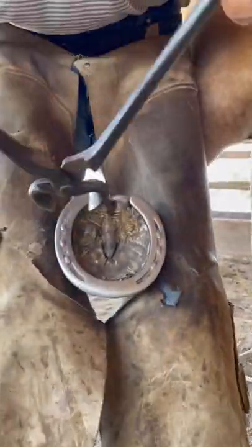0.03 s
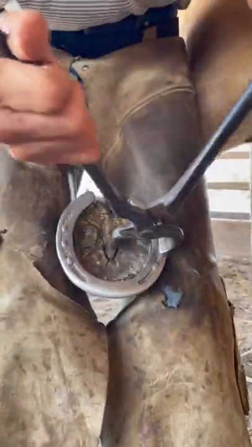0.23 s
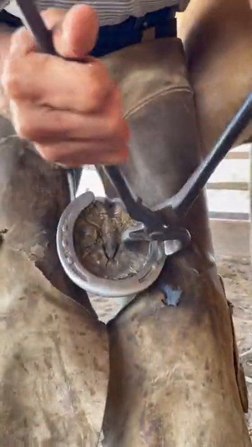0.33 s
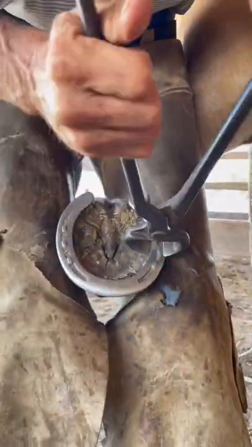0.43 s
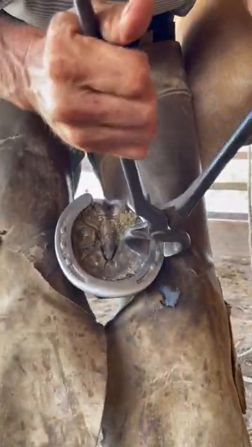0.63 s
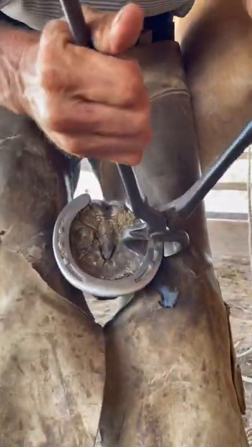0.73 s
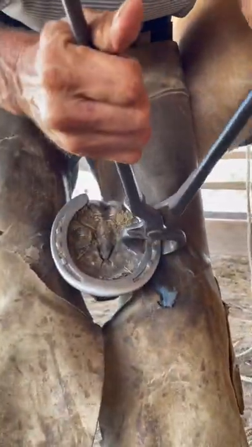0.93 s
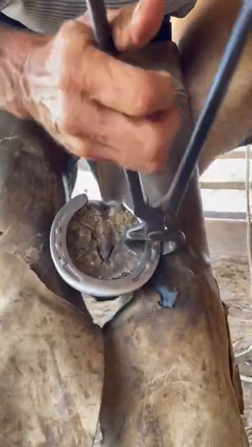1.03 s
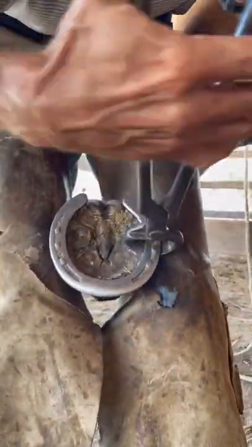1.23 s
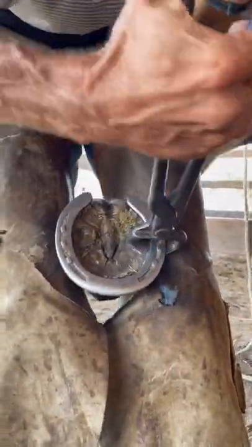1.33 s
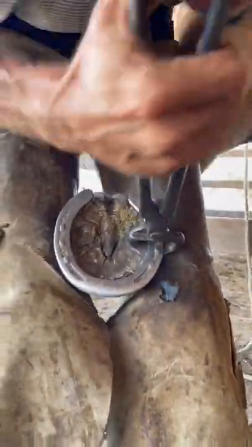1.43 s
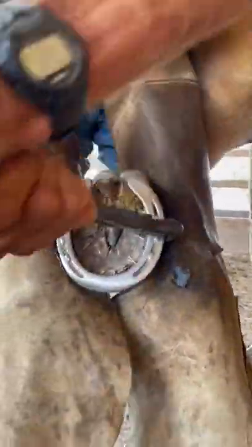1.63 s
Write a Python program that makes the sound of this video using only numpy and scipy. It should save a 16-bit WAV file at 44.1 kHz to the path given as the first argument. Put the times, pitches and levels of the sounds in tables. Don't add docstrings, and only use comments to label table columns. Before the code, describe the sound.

A steel farrier's tool knocks a horseshoe three times in quick succession, with dull hoof and leather thuds, then scrapes grit in short strokes with sharp ticks; close phone microphone in a quiet barn.

```python
import sys
import numpy as np
from scipy import signal
from scipy.fft import rfft, irfft
from scipy.io import wavfile
from scipy.ndimage import uniform_filter1d, minimum_filter1d

SR = 44100
rng = np.random.default_rng(int(sys.argv[2]) if len(sys.argv) > 2 else 0)


def volts_from_db(level):
    exponent = np.asarray(level, float) / 20
    return 10 ** exponent


def store_pcm(level_fs):
    pcm = np.round(np.clip(level_fs, -1, 1) * 32767).astype(np.int16)
    wavfile.write(sys.argv[1], SR, np.atleast_2d(pcm).T)


N = 74970


def read(points, hz):
    f, value = np.transpose(points)
    return np.interp(np.log(hz + 1), np.log(f + 1), value)


def evened(x):
    return x / np.sqrt(np.mean(x ** 2) + 1e-20)


def add(mix, start_s, sound):
    part = mix[round(start_s * SR):][:len(sound)]
    part += sound[:len(part)]


def colour(x, points, tilt_db=0.):
    hz = np.fft.rfftfreq(len(x), 1 / SR)
    gain_db = read(points, hz) + tilt_db * np.log2((hz + 50) / 3000)
    return irfft(rfft(x) * volts_from_db(gain_db), len(x))


def resonate(x, hz, width_hz):
    r = np.exp(-np.pi * width_hz / SR)
    return 2 * signal.lfilter([1 - r], [1, -r * np.exp(2j * np.pi * hz / SR)], x).real


def wander(rate_hz):
    size = max(int(SR / rate_hz), 1)
    smooth = uniform_filter1d(rng.standard_normal(N), size, mode="wrap")
    return evened(uniform_filter1d(smooth, size, mode="wrap"))


# frequency in Hz, level in dB.
AIR = [(28, -27), (50, 0.5), (190, -7), (370, -11), (520, -17.5), (3000, -41)]
WIDE_AIR = [(40, -21), (140, -3), (600, -1), (1400, -15.5), (1900, -47), (2600, -19), (8000, -17)]
AIR_DB, AIR_LUMPS_DB, WIDE_AIR_DB = -55, 1.5, -61.5
# frequency in Hz, width in Hz, level in dB.
CLATTER = [(845, 33, 8), (1285, 82, 0.5), (2012, 41, -4)]
CLATTER_DB, CLATTER_T60_S = -48, 1.85
SING_HZ, SING_WIDTH_HZ, SING_DB, SING_T60_S = 4600, 73, -66, 7.3


def barn():
    t = np.arange(N) / SR
    air_noise, clatter_noise, sing_noise, wide_noise = rng.standard_normal((4, N))
    air = volts_from_db(AIR_DB + AIR_LUMPS_DB * wander(13)) * evened(colour(air_noise, [*AIR, (6000, -77)]))
    modes = sum(volts_from_db(db) * resonate(clatter_noise, hz, 1.37 * width_hz) for hz, width_hz, db in CLATTER)
    clatter = volts_from_db(CLATTER_DB - 60 * t / CLATTER_T60_S) * evened(modes)
    sing = volts_from_db(SING_DB - 60 * t / SING_T60_S) * evened(resonate(sing_noise, SING_HZ, SING_WIDTH_HZ))
    wide = volts_from_db(WIDE_AIR_DB) * evened(colour(wide_noise, [*WIDE_AIR, (12000, -53)]))
    return air + clatter + sing, wide - .17 * clatter


# time in seconds, level in dB.
RUB = [(0, -59.5), (.2, -56), (.45, -58), (.64, -60.5), (.75, -64), (.778, -78), (.79, -47), (.83, -62.5),
       (.885, -68.5), (.925, -56.5), (1.1, -57.5), (1.22, -55.5), (1.315, -57.5), (1.335, -60), (1.42, -51),
       (1.7, -54.5)]
# frequency in Hz, level in dB.
HISS = [(500, -2), (1200, 0), (2500, -1.5), (4600, -6), (7000, 1), (9500, -4), (13000, -4.5), (16500, -11)]


def rubbing():
    t = np.arange(N) / SR
    level_db = np.interp(t, *np.transpose(RUB)) + 1.8 * wander(57)
    return volts_from_db(level_db) * evened(colour(rng.standard_normal(N), HISS))


# frequency in Hz, level in dB.
GRIT = [(300, -12), (1000, -4.5), (2500, -2.5), (4500, -0.5), (7000, -1.5), (9500, 3.5), (13000, -1),
        (16500, -6)]
# start in seconds, peak in dB, centre in Hz, ring over snap in dB.
TICKS = [(0.1313, -33.5, 3070, 13), (0.584, -42, 2300, 0), (.676, -41, 7630, 4), (.700, -39, 3850, 5),
         (.728, -37.5, 6360, 12), (0.925, -37, 2140, -10), (0.9626, -36, 3250, 4), (0.9954, -30.5, 3510, 1),
         (1.052, -57, 3000, -1), (1.3656, -43.5, 3900, -18), (1.3751, -38.5, 3260, -3),
         (1.451, -25, 6100, -6), (1.466, -36, 5700, -11), (1.4798, -15.5, 6490, -10), (1.499, -35, 3870, 7),
         (1.5083, -29.5, 6430, -13.5), (1.5386, -31, 2960, -6), (1.601, -45, 7000, -12),
         (1.687, -42, 5240, -10)]
TICK_T60_S, TICK_RISE_S = 0.017, 0.00029
PING_PAIR_RATIO, TICK_TILT_DB = 1.09, 3.5


def ticks():
    mix, t = np.zeros(N), np.arange(2500) / SR
    for start_s, db, hz, ring_db in TICKS:
        tilt_db = TICK_TILT_DB * np.log2(hz / 4000)
        snap = evened(colour(rng.standard_normal(len(t)), GRIT, tilt_db))
        ping = np.sin(2 * np.pi * hz * t) + 0.54 * np.sin(2 * np.pi * PING_PAIR_RATIO * hz * t)
        tone = volts_from_db(ring_db / 2) * ping + volts_from_db(-ring_db / 2) * snap
        shape = volts_from_db(db - 60 * t / TICK_T60_S) * np.minimum(t / TICK_RISE_S, 1)
        add(mix, start_s, 0.39 * shape * tone)
    return mix


# frequency in Hz, level in dB.
CRACK = [(250, -17.5), (1000, 4), (1600, -4), (2200, 2.5), (4000, 4.5), (6500, -4), (9500, 4.5),
         (16500, -13.5)]
BUZZ, BUZZ_HZ = 0.42, 306


def knock(mix, modes, lead_s, tilt_db, start_s, ring_db, crack_db, rattle_t60_s, touch_db):
    t = np.arange(8000) / SR
    rattle, crack_noise, touch_noise = rng.standard_normal((3, len(t)))
    shape = np.minimum(t / 0.00076, 1) * volts_from_db(-60 * t / rattle_t60_s)
    buzz = 1 + BUZZ * evened(uniform_filter1d(touch_noise, int(SR / BUZZ_HZ)))
    ring = np.zeros(len(t))
    for hz, db, t60_s in modes:
        response = volts_from_db(-60 * t / t60_s) * np.sin(2 * np.pi * hz * t)
        mode = evened(signal.fftconvolve(rattle * shape ** 2, response)[:len(t)])
        ring += volts_from_db(db) * np.sqrt(t60_s) * np.roll(buzz, int(hz)) * mode
    crack = evened(colour(crack_noise, CRACK, tilt_db)) * shape
    add(mix, start_s, volts_from_db(ring_db) * evened(ring) + volts_from_db(crack_db + 16.5) * crack)
    touch = evened(resonate(resonate(touch_noise, 3400, 4000), 3300, 4000)) * volts_from_db(-60 * t / 0.12)
    add(mix, start_s - lead_s, volts_from_db(touch_db + 11.5) * touch)


# frequency in Hz, level in dB, t60 in seconds.
SHOE = [(675.7, -19.5, 0.11), (2090, -11.5, 0.016), (3160, -15.5, 0.045), (4624, -19.5, 0.084),
        (5740, -7.5, 0.028), (6457, -14, 0.042), (7510, -7.5, 0.019), (8700, -12.5, 0.027),
        (9780, -14.5, 0.02), (10980, -14.5, 0.017), (15230, -24, 0.0156)]
JAW = [(1970, -8.5, 0.059), (2550, -5, 0.015), (3550, 1, 0.02), (3737, -6, 0.032), (4700, -7, .06),
       (5900, -7, 0.026), (7000, -11.5, 0.051), (11400, -36, 0.03)]
HEEL = [(1477, -9.5, .025), (1925, -4, 0.025), (3000, -4, .015), (5774, -7, 0.018), (9850, -19, .02)]
NAIL = [(1943, -29, .03), (2810, -3.5, 0.022), (3190, 3, 0.021), (4680, -16.5, 0.087), (5670, -2, 0.026),
        (6590, -4.5, 0.034)]
# start in seconds, ring in dB, crack in dB, rattle t60 in seconds, first touch in dB.
KNOCKS = [
    (0.2142, -26.5, -31, 0.041, -44.5),
    (0.3307, -34.5, -33.5, 0.012, -51),
    (0.3891, -43, -31.5, 0.016, -47),
    (.7970, -47.5, -52, 0.045, -71),
]
TOUCH_LEAD_S = [.0072, .0078, .0095, .011]
CRACK_TILT_DB = [0.71, 1, -3.02, 0.49]


def knocks():
    mix = np.zeros(N)
    for modes, lead_s, tilt_db, row in zip((SHOE, JAW, HEEL, NAIL), TOUCH_LEAD_S, CRACK_TILT_DB, KNOCKS):
        knock(mix, modes, lead_s, tilt_db, *row)
    return mix


# start in seconds, level in dB, pitch in Hz, t60 in seconds.
THUDS = [(.2160, -9.5, 975, 0.046), (0.21, -9, 245, 0.037), (.2170, -19.5, 372, 0.057),
         (0.4, -18, 218, 0.035), (.3340, -36, 700, 0.09), (.7990, -20, 178, 0.056),
         (0.8965, -29, 1095, 0.058), (0.74, -41, 2700, 0.021), (0.8957, -28.5, 505, 0.034),
         (0.9243, -33, 840, 0.041), (.9270, -23, 190, 0.054), (1.0974, -26.5, 395, 0.025),
         (1.189, -35, 460, 0.033), (1.196, -32, 186, 0.049), (1.298, -43, 694, .04),
         (.585, -30.5, 470, 0.014), (1.404, -43, 850, 0.085), (1.413, -44, 720, 0.13),
         (1.548, -41.5, 680, 0.15), (1.025, -56, 260, 0.054)]
SAG_S, SAG_DECAY_S = 0.0017, 0.0028
SCUFF = 0.5


def thuds():
    mix, t = np.zeros(N), np.arange(5000) / SR
    for start_s, db, hz, t60_s in THUDS:
        turns = hz * (t + SAG_S * (1 - np.exp(-t / SAG_DECAY_S)))
        fall = volts_from_db(-60 * t / t60_s)
        noise = resonate(rng.standard_normal(len(t)), hz, 0.94 * hz)
        scuff = evened(resonate(noise, hz, 3.5 * hz)) * fall
        tones = np.sin(2 * np.pi * turns) + 0.73 * np.sin(2 * np.pi * 0.586 * turns)
        shape = volts_from_db(db) * fall * np.minimum(t * hz * 0.81, 1)
        add(mix, start_s, 0.5 * shape * (tones + SCUFF * scuff))
    return mix


# frequency in Hz, t60 in seconds.
ECHO = [(200, 0.72), (700, 0.36), (3000, 0.2), (12000, .15)]
ECHO_DB = -18


def echoes(x):
    hz, t, z = signal.stft(rng.standard_normal((2, SR // 2)), SR, nperseg=128)
    fall = volts_from_db(-60 * t / read(ECHO, hz)[:, None])
    tail = signal.istft(z * fall, SR, nperseg=128)[1]
    return volts_from_db(ECHO_DB) * signal.fftconvolve(x[None], tail / np.linalg.norm(tail[0]), axes=1)[:, :N]


# start in seconds, length in seconds, level in dB.
STROKES = [
    (0.666, 0.087, -46.5),
    (0.933, .12, -50),
    (1.158, 0.13, -54),
    (1.271, 0.048, -46.5),
    (1.36, 0.016, -61),
    (1.392, 0.038, -59),
]
STROKE_EDGE = 0.33


def strokes():
    t = np.arange(N) / SR
    stroke = np.zeros(N)
    for start_s, length_s, db in STROKES:
        to_edge_s = np.minimum(t - start_s, start_s + length_s - t)
        stroke += volts_from_db(db) * np.clip(to_edge_s / (STROKE_EDGE * length_s), 0, 1)
    sizes = volts_from_db(1.9 * np.minimum(rng.exponential(1, N), 4))
    grains = sizes * rng.standard_normal(N) * (rng.random(N) < .25)
    return stroke * volts_from_db(3.6 * wander(140)) * evened(colour(grains, GRIT))


SIDE_SNAP_S, SIDE_SNAP_DB, SIDE_SNAP_HZ, SIDE_SNAP_WIDTH_HZ, SIDE_SNAP_T60_S = 0.99, -30, 700, 1050, 0.024


def side_snap():
    mix, t = np.zeros(N), np.arange(2000) / SR
    snap = evened(resonate(rng.standard_normal(len(t)), SIDE_SNAP_HZ, SIDE_SNAP_WIDTH_HZ))
    add(mix, SIDE_SNAP_S, volts_from_db(SIDE_SNAP_DB - 60 * t / SIDE_SNAP_T60_S) * snap)
    return mix


def scene():
    struck = signal.lfilter(*signal.butter(2, 90, "high", fs=SR), knocks() + thuds())
    hits = struck + ticks()
    wet = echoes(hits)
    near, wide = barn()
    side = wide + 0.33 * wet[1] + side_snap()
    front = hits + wet[0] + rubbing() + strokes() + near
    return np.array([front, side])


STARVED_HZ, STARVED_DB, KEPT_DB, MASKED_DB = 8200, -8, -71, -36
SIDE_EDGE_HZ, EDGE_HZ, LOUD_EDGE_HZ = 13900, 15900, 17200


def starve(mid, side):
    hz, _, z = signal.stft(np.array([mid, side]), SR, nperseg=256)
    power = uniform_filter1d(uniform_filter1d(abs(z) ** 2, size=5, axis=1), size=5, axis=2)
    level = 10 * np.log10(abs(power) + 1e-20)
    recent = -minimum_filter1d(-level[0, 8:].max(0), size=7, origin=3)
    f, loud = hz[:, None], level > KEPT_DB
    mid_leads = (level[0] - level[1] > STARVED_DB) & (f < EDGE_HZ)
    unmasked = level[0] > recent + MASKED_DB
    keep_mid = (f < STARVED_HZ) | (loud[0] | mid_leads) & unmasked
    keep_side = loud[1] | (f < SIDE_EDGE_HZ)
    keep = np.array([keep_mid, keep_side]) & (f < LOUD_EDGE_HZ)
    return signal.istft(z * keep, SR, nperseg=256)[1][:, :N]


# frequency in Hz, lead of the left in radians.
PORTS = [(0, -1), (2000, 0.4861), (4000, 0.8), (5600, 0.95), (8000, 2), (10100, np.pi), (12200, 4.5),
         (14500, 6), (22050, 13.5)]


def ports(dry):
    half = .5 * read(PORTS, np.fft.rfftfreq(N, 1 / SR))
    front = rfft(dry[0])
    mid = irfft(front * (np.cos(half) + .12j * np.sin(half)), N)
    side = irfft(1j * front * np.sin(half), N) + dry[1]
    return mid, side


def low_pass(x):
    return signal.sosfilt(signal.butter(12, 17490, fs=SR, output="sos"), x)


def record(dry):
    mid, side = starve(*ports(dry))
    return low_pass(np.tanh(np.array([mid + side, mid - side])))


dry = scene()
out = record(dry)
store_pcm(out)
```